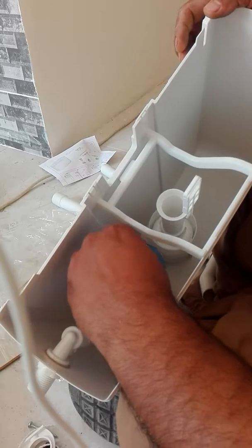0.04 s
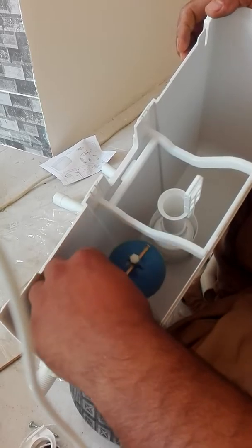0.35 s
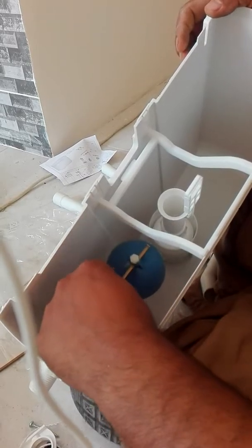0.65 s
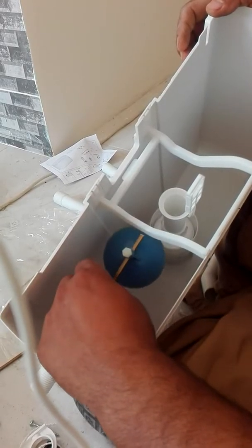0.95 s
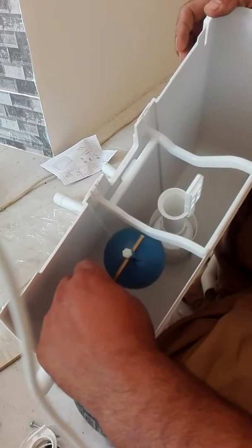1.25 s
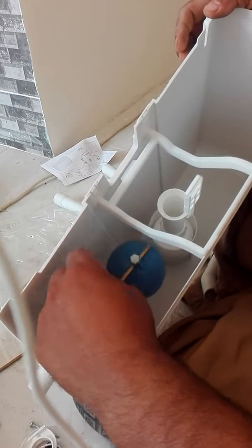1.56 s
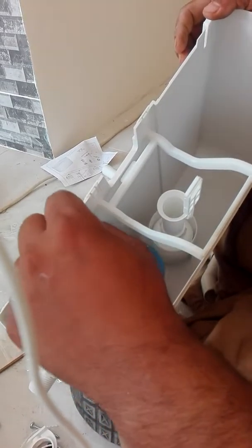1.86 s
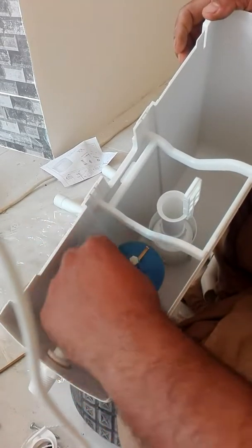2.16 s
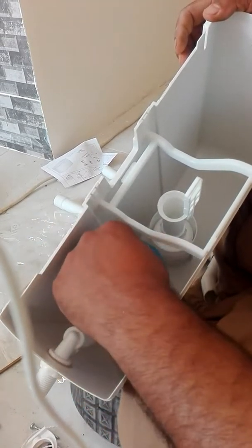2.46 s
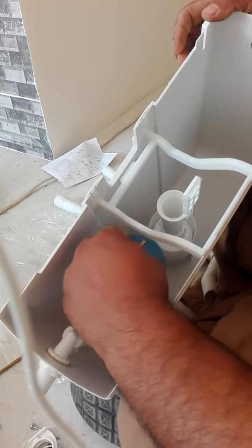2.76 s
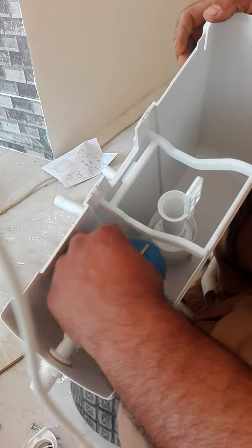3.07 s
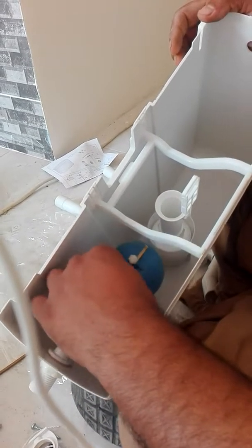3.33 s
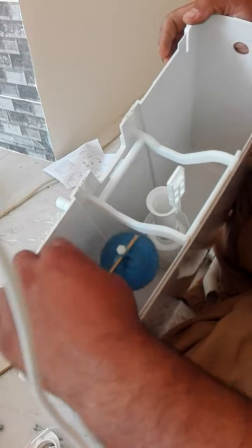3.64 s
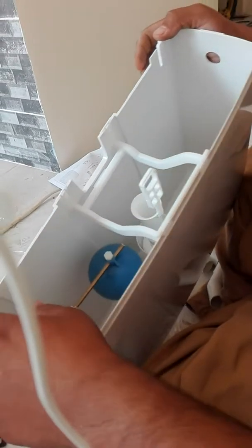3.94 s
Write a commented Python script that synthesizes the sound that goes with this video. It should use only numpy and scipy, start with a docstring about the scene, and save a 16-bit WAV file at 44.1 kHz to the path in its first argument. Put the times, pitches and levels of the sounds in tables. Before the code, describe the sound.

Plastic parts knock inside an empty toilet tank, starting with a hollow thump at about 0.3 seconds. After faint rubbing, a quick clatter with low thumps runs from 1.6 to 2 seconds. A quiet gap follows, then another thump at 3.2 and the loudest clatter from 3.6 to 3.9. The knocks echo in a tiled room over a faint low hum and hiss.

```python
"""In a bare tiled room, a hand works the float valve inside an empty plastic toilet cistern (the tank).
Each move knocks small plastic parts together and pushes the tank wall, which gives a hollow thump.
In between, parts slide and rub in many tiny slips. The tiles echo every knock,
above a faint low hum, two drones and hiss."""
import sys
import numpy as np
from scipy import signal
from scipy.fft import rfft, irfft
from scipy.io import wavfile
from scipy.ndimage import uniform_filter1d

SR = 44100
rng = np.random.default_rng(int(sys.argv[2]) if len(sys.argv) > 2 else 0)


def pcm_store(signal):
    """Save signal as 16-bit PCM."""
    levels = np.round(np.clip(np.atleast_2d(signal), -1, 1) * 32767)
    wavfile.write(sys.argv[1], SR, levels.astype(np.int16).T)


N = 176400  # 4 seconds


def knocks(knock_db=-8, crack_fade_s=0.039, ring_db=-28.5, width_octaves=0.48, detune=0.028, spread_db=2.5):
    """Each contact gives a short crack of the shell and rings the tones near the struck part's pitch."""
    # parts knocking: t/s, relative level/dB, treble tilt/(dB per octave), contact time/s,
    # extra ring/dB, centre of the ring f/Hz
    hits = [(0.3168, -25, -9, 0.00054, 15.5, 2100), (0.3257, -19.5, -12, 0.00059, 20.5, 2110),
            (.335, -24, 1.5, 0.00052, 18, 1790), (.345, -11, -10, 0.0037, 4.5, 1300),
            (.371, -21.5, 0, 0.00049, 25.5, 5500), (1.3721, -36.5, 5, 0.00058, 9, 4040),
            (1.667, -14, 1, .002, 13.5, 1570), (1.682, -14.5, -9, 0.0024, 27, 4240),
            (1.6873, -10, -1.5, 0.00068, 13, 1420), (1.7125, -7, 0.5, 0.0011, 13, 2940),
            (1.732, -17, 0, 0.0025, 21, 3000), (1.7876, -9, -0.5, 0.0012, 9.5, 1960),
            (1.8084, -11, -9, 0.003, 11.5, 1380), (1.8298, -12.5, 1, 0.0023, 10, 1690),
            (1.889, -12, -1.5, 0.0022, 9, 1720), (1.907, -15.5, -23, 0.00081, -6, 1500),
            (1.947, -15.5, -5, 0.0023, 18, 2020), (2.556, -40, -3, .003, -15, 1290),
            (2.8805, -37.5, 7, 0.00045, 4, 4000), (3.1806, -17, -6, 0.0015, 9, 1970),
            (3.2004, -12.5, -11, 0.003, 12, 1330), (3.2245, -16, 3.5, 0.00063, 10, 6000),
            (3.546, -26.5, -4, .001, 4, 1270), (3.5767, -29, 3, 0.0006, 17, 2240),
            (3.6267, -21, 1, 0.0056, 6, 1300), (3.6491, -13, -5.5, .005, 20, 4020),
            (3.6677, -6, 3.5, 0.004, 15, 1990), (3.685, -2.5, 0, 0.0024, 9.5, 1790),
            (3.712, -4, -1, 0.0025, 6, 1750), (3.741, -13, -4, 0.0038, 9, 1400),
            (3.8082, -19.5, 4, 0.00089, 29, 5900), (3.8278, -12.5, -7, 0.0015, 11, 1780),
            (3.846, -15, 2, 0.0013, 10.5, 1670), (3.889, -15.5, -0.5, 0.0018, 5, 3000),
            (3.933, -16.5, -1.5, 0.0025, 7, 4050)]
    # natural tones of the plastic parts: f/Hz, level/dB, time to fade by 60 dB/s
    part_tones = [(704, -8, 0.015), (920, -8, 0.085), (1285, 5.5, 0.025), (1475, -12, 0.062),
                  (1680, -6.5, 0.039), (1902, -1.5, 0.026), (2085, -7, 0.028), (2228, -6, 0.027),
                  (2803, -13, 0.023), (3900, -18, 0.021), (4180, -17.5, 0.017), (5950, -25, 0.032)]
    # tone colour of the shell's crack: f/Hz, level/dB
    crack_spectrum = [(60, 0.5), (150, -3.5), (260, 12), (345, -0.5), (430, -5), (505, 6.5), (670, -5),
                      (760, 1.5), (1050, -4), (1290, 3.5), (1520, -6), (1700, 0.5), (2100, -8.5),
                      (2650, -10), (3000, -9), (4300, -14), (6000, -19.5), (6600, -28.5), (9400, -31),
                      (10300, -40.5), (14000, -43)]
    cracks, rings, t = np.zeros(N), np.zeros(N), np.arange(SR // 6) / SR
    for start, db, tilt_db, contact_s, extra_db, centre_hz in hits:
        attack = 1 - np.exp(-t / contact_s)
        burst = rng.standard_normal(len(t)) * amp(-60 * t / crack_fade_s) * attack
        crack = colour(burst / np.linalg.norm(burst), crack_spectrum, tilt_db)
        add(cracks, start, amp(knock_db + db) * crack)
        tones = np.zeros(len(t))
        for hz, level, fade_s in part_tones:
            pitch_luck, level_luck, polarity = rng.standard_normal(3)  # no two knocks ring alike
            nearness = np.exp(-0.5 * (np.log2(hz / centre_hz) / width_octaves) ** 2)
            tone = (hz * (1 + detune * pitch_luck), level + spread_db * level_luck, fade_s)
            tones += np.sign(polarity) * nearness * ring([tone], t)
        add(rings, start, amp(knock_db + db + ring_db + extra_db) * tones * attack)
    return cracks, rings


def thumps(hollow_rise_s=0.02, boom_rise_s=0.0095, rock_hz=65.25, rock_swell_s=0.038):
    """The pushed wall shakes briefly, the tank rocks, its hollow rings, and the room booms low."""
    # the wall pushed and let go: t/s, level/dB, f/Hz, swell time/s, relative boom/dB, relative rocking/dB
    pushes = [(.333, -34.5, 238.6, 0.021, -0.5, -18), (1.015, -55.5, 235.5, 0.02, -17, -18),
              (1.621, -48, 239, 0.038, -20, -26), (1.662, -33.5, 237.7, 0.04, -8, -14.5),
              (1.716, -40, 234, 0.009, -5, -11), (1.831, -42.5, 254, 0.0092, -1.5, -8.5),
              (1.975, -43, 234.2, 0.024, -16, -13), (2.546, -49.5, 232, 0.018, -5, -23),
              (3.18, -31, 241.1, 0.028, 0.5, -18.5), (3.245, -36.5, 276.3, .02, -27, -28),
              (3.555, -44, 241.4, 0.018, -6.5, -20), (3.669, -29, 240.3, 0.02, -15.5, -27),
              (3.722, -36.5, 247.4, .016, -18, -25), (3.83, -35.5, 246.3, 0.019, -7.5, -24)]
    # tones of the hollow inside the tank: f/Hz, level/dB, time to fade by 60 dB/s
    hollow_tones = [(234.2, -12.5, 1), (259, -17.5, 1), (302.4, -20.5, 1), (497, -31, 0.87)]
    # long low resonances of the room, set ringing by each thump: f/Hz, level/dB, time to fade by 60 dB/s
    room_tones = [(84.5, -15, .4), (108.5, -10, 1.55), (132.3, -17.5, 1.1), (172, -8.5, 0.8),
                  (335, -18.5, .5)]
    out, t = np.zeros(N), np.arange(2 * SR) / SR
    hollow = ring(hollow_tones, t) * (1 - np.exp(-t / hollow_rise_s))
    boom = ring(room_tones, t) * (1 - np.exp(-t / boom_rise_s))
    rock = t / rock_swell_s * np.exp(1 - t / rock_swell_s) * np.sin(2 * np.pi * rock_hz * t)
    for start, db, hz, swell_s, boom_db, rock_db in pushes:
        wall = (t / swell_s * np.exp(1 - t / swell_s)) ** 2 * np.sin(2 * np.pi * hz * t)
        add(out, start, amp(db) * (wall + hollow + amp(boom_db) * boom + amp(rock_db) * rock))
    return out


def rubs(slips_per_s=2500, spread_db=-1):
    """Sliding parts make many tiny slips, which blur into a rub that swells and fades."""
    # sliding strokes: t/s, length/s, level/dB, treble tilt/(dB per octave)
    strokes = [(0.272, 0.19, -57, -8), (0.719, .15, -57, 1), (0.899, 0.17, -69, -7),
               (1.609, 0.12, -59.5, -2), (1.672, 0.2, -56.5, 1.5), (2.524, 0.17, -71.5, -5),
               (3.123, 0.26, -55.5, -7.5), (3.185, 0.059, -49, -4), (3.553, 0.094, -56, -7.5),
               (3.634, .05, -47.5, -3), (3.681, 0.26, -52, 0)]
    # tone colour of sliding plastic: f/Hz, level/dB
    slide_spectrum = [(60, -8), (150, 4.5), (235, 13.5), (400, 3), (660, -7.5), (790, 5.5), (1000, -9),
                      (1400, -1.5), (2400, -5.5), (3500, -10), (5300, -13), (6800, -25.5), (14000, -37.5)]
    out = np.zeros(N)
    for start, length_s, db, tilt_db in strokes:
        strengths = rng.standard_normal(SR) * amp(spread_db * np.minimum(rng.exponential(1, SR), 4))
        slips = strengths * (rng.random(SR) < slips_per_s / SR)
        arch = np.sin(np.linspace(0, np.pi, int(length_s * SR)))
        add(out, start, amp(db) * arch * unit(colour(slips, slide_spectrum, tilt_db))[:len(arch)])
    return out


def room(x, patterns=3, cycles_per_s=2.5, rise_s=0.0069):
    """Dense echoes off the tiles, the treble dying first."""
    # how long the room rings: f/Hz, time to fade by 60 dB/s
    fade_times = [(100, 1.4), (260, 0.87), (700, 0.89), (1700, 0.84), (2300, 0.56), (3200, 0.61),
                  (5000, 0.28), (9000, 0.19), (14000, .2)]
    hz, t, noise = signal.stft(rng.standard_normal((patterns, SR)), SR, nperseg=256)
    fade_s = read(fade_times, hz)[:, None]
    tails = signal.istft(noise * amp(-60 * t / fade_s), SR, nperseg=256)[1][:, :SR]
    longest_energy = SR * fade_s.max() / np.log(1e6)
    tails *= (1 - np.exp(-np.arange(SR) / SR / rise_s)) / np.sqrt(longest_energy)
    # three echo patterns take turns at a steady rate, so knocks echo differently
    cycle = np.arange(N) / SR * cycles_per_s + np.arange(patterns)[:, None] / patterns
    shares = np.cos(np.pi * cycle) ** 4
    return signal.fftconvolve(x * shares / np.linalg.norm(shares, axis=0), tails, axes=1).sum(0)[:N]


def drones(pitches_hz=(74.3, 132.1), waver=0.02, flutter=0.21):
    """Two low tones swell and sink, wobbling a little in loudness and pitch."""
    # loudness of the drones over time: t/s, lower drone level/dB, upper drone level/dB
    swells = [(0, -79.5, -76), (1, -79, -74), (1.5, -75, -86), (2, -60, -62.5), (2.4, -67.5, -57),
              (2.55, -63, -73.5), (2.85, -69, -60), (3.12, -48.5, -66), (3.3, -62, -53.5), (4, -74, -69)]
    times, *levels = np.transpose(swells)
    out, t = np.zeros(N), np.arange(N) / SR
    for hz, db in zip(pitches_hz, levels):
        loudness = amp(np.interp(t, times, db)) * (1 + flutter * drift(9))
        out += loudness * wavering_tone(hz, waver, rate_hz=5.2)
    return out


def hum(hz=46.85, level_db=-62.5):
    """A faint, deep tone whose pitch wanders slightly."""
    return amp(level_db) * unit(wavering_tone(hz, depth=0.014, rate_hz=2))


def hiss(level_db=-65):
    """Steady hiss and rumble; only the treble differs between left and right."""
    # tone colour of the background noise: f/Hz, level/dB
    noise_spectrum = [(12, -43), (22, -24), (34, -12.5), (60, -8.5), (100, -17), (140, -17), (190, -24.5),
                      (242, -17.5), (390, -34.5), (470, -34), (600, -37.5), (1500, -34.5), (2230, -39.5),
                      (4700, -40.5), (14000, -41.5)]
    # how alike left and right are: f/Hz, likeness (0 to 1)
    likeness = [(100, 1), (1500, 1), (4000, 1), (7000, 0.76), (14000, 0.33)]
    hz = np.fft.rfftfreq(N, 1 / SR)
    common, left, right = rfft(rng.standard_normal((3, N)))
    same = read(likeness, hz)
    stereo = np.sqrt(same) * common + np.sqrt(1 - same) * np.array([left, right])
    return amp(level_db) * unit(irfft(stereo * amp(read(noise_spectrum, hz)), N))


def amp(db):
    """Turns decibels into a factor to multiply by."""
    return 10 ** (np.asarray(db) / 20)


def unit(x):
    """Scales a sound to an average power of 1."""
    return x / np.sqrt(np.mean(x ** 2) + 1e-20)


def read(points, hz):
    """Reads between a table's rows, with frequency spaced in octaves."""
    f, value = np.transpose(points)
    return np.interp(np.log(hz + 1), np.log(f), value)


def add(mix, start_s, sound):
    """Mixes a sound in at a given time."""
    part = mix[max(round(start_s * SR), 0):][:len(sound)]
    part += sound[:len(part)]


def colour(x, spectrum, tilt_db, tilt_from_hz=1500):
    """Gives a sound a tone colour, with the treble tilted by tilt_db per octave."""
    hz = abs(np.fft.fftfreq(2048, 1 / SR))
    octaves = np.log2(np.maximum(hz, tilt_from_hz) / tilt_from_hz)
    log_gain = np.log(amp(read(spectrum, hz) + tilt_db * octaves))
    taps = np.fft.ifft(np.exp(np.conj(signal.hilbert(log_gain)))).real  # rings after a hit, never before
    return signal.fftconvolve(x, taps / np.linalg.norm(taps))[:len(x)]


def ring(tones, t):
    """Adds up pure tones, each fading by 60 dB in its own time."""
    return sum(amp(db - 60 * t / fade_s) * np.sin(2 * np.pi * hz * t) for hz, db, fade_s in tones)


def drift(rate_hz):
    """A slow random wander around zero, about 1 in size."""
    hz = np.fft.rfftfreq(N, 1 / SR)
    return unit(irfft(rfft(rng.standard_normal(N)) * np.exp(-(hz / rate_hz) ** 2) * (hz > 0), N))


def wavering_tone(hz, depth, rate_hz):
    """A pure tone whose pitch wanders by about the fraction depth."""
    return np.sin(2 * np.pi * np.cumsum(hz * (1 + depth * drift(rate_hz))) / SR)


def scene():
    """Knocks, thumps and rubs, heard directly and as echoes, over the background."""
    cracks, rings = knocks()
    thump, rub = thumps(), rubs()
    echo = room(amp(4) * cracks + amp(1.5) * rings + amp(-6) * thump + amp(2) * rub)
    return cracks + rings + thump + rub + echo + hiss() + hum() + drones()


def record(dry, max_cut_db=5, knee_db=4, cut_from_hz=170, top_hz=14300):
    """A mild noise suppressor turns down sound near the background level; the top treble is cut off."""
    hz, _, spectra = signal.stft(dry, SR, nperseg=1024, noverlap=768)
    power = (abs(spectra) ** 2).mean(0)
    power = uniform_filter1d(uniform_filter1d(power, size=7, axis=0), size=5, axis=1)
    floor = np.quantile(power, 0.2, axis=1, keepdims=True) + 1e-30
    over_knee = power / floor / amp(knee_db) ** 2  # knee_db above the floor, the cut is halved
    cut_db = max_cut_db * (hz[:, None] > cut_from_hz) / (1 + over_knee ** 2)
    quieter = signal.istft(spectra * amp(-cut_db), SR, nperseg=1024, noverlap=768)[1][:, :N]
    lowpass = signal.firwin(511, top_hz, window=("kaiser", 9), fs=SR)
    return signal.oaconvolve(quieter, lowpass[None], "same")


dry = scene()
out = record(dry)
pcm_store(out)
```